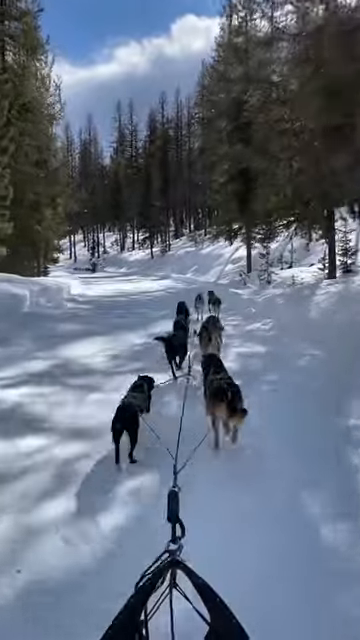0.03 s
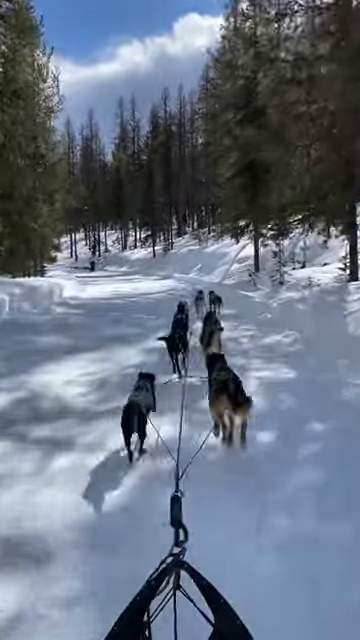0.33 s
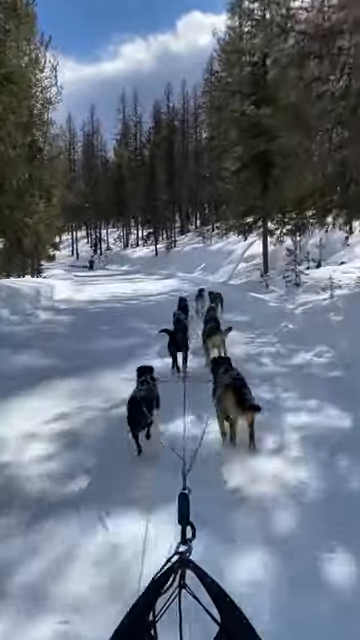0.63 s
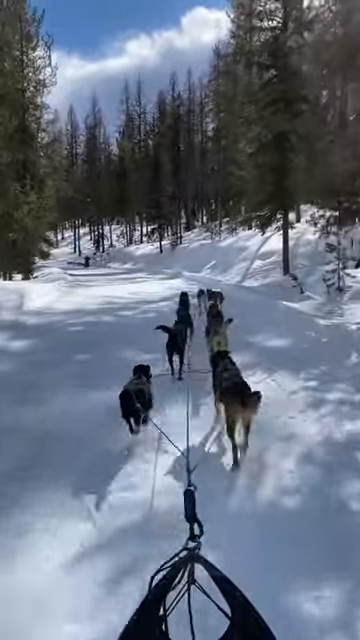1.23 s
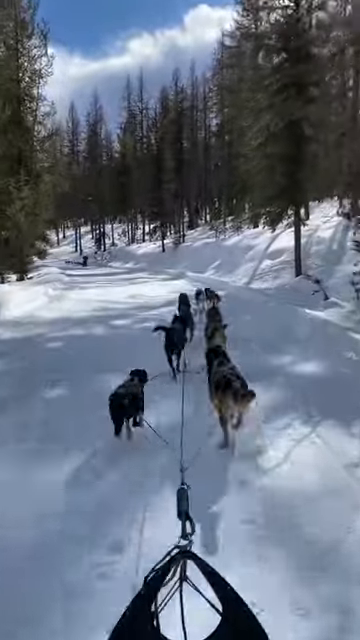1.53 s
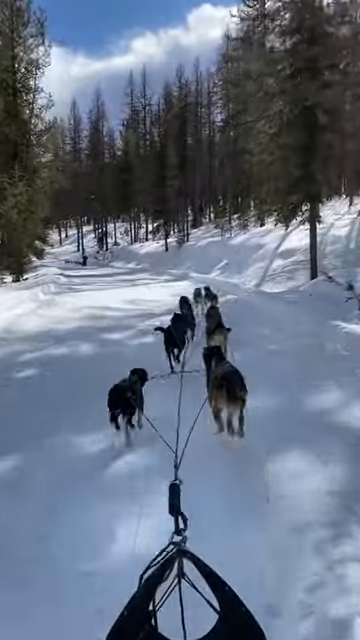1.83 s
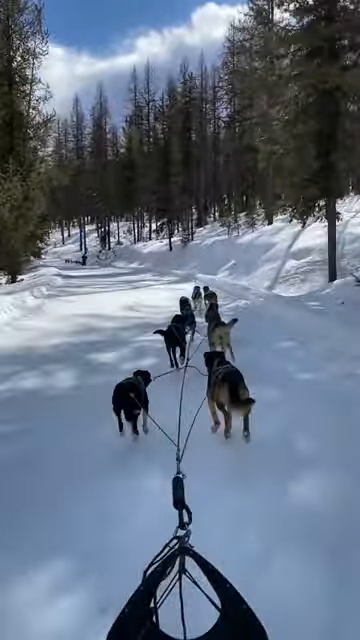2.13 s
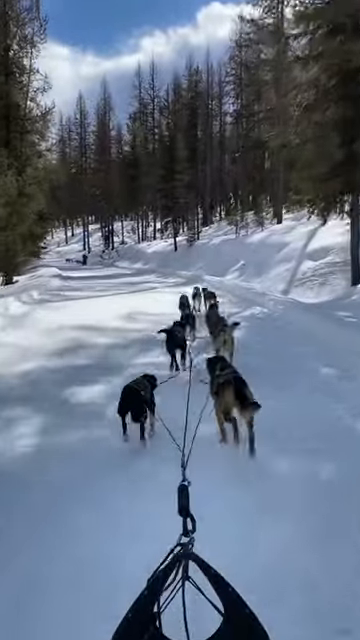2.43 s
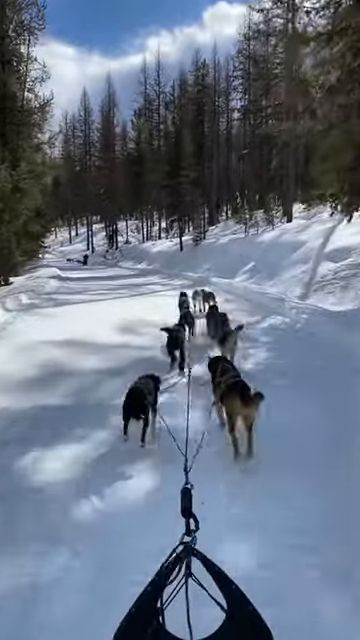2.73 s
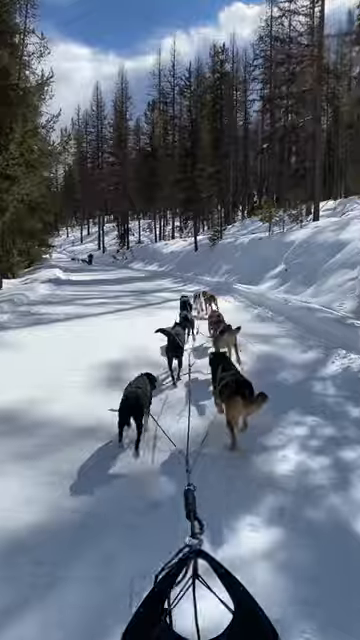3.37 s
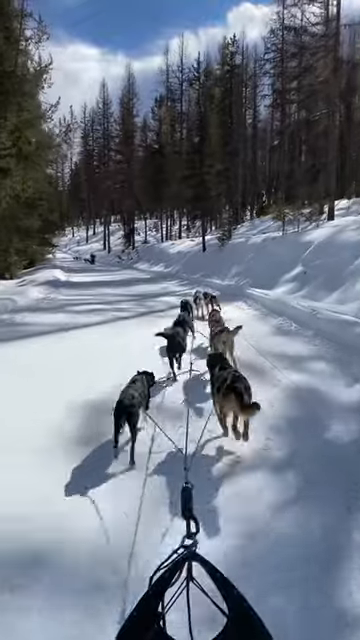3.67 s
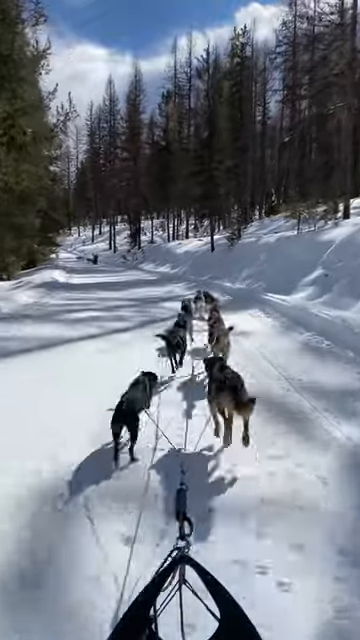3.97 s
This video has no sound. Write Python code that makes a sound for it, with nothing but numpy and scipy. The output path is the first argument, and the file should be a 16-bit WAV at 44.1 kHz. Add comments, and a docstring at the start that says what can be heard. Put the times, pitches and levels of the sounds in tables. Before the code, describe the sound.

A dog sled rattles and hisses over packed snow, paws pattering ahead.

```python
"""A low rattle and rumble over hissing snow: a dog sled on a packed forest trail, heard from a phone on it.
Ridges drive the frame's modes, small jolts of the frame rumble low, and snow grains ring the sliding runners.
Harder bumps thud through the sled, and loaded runners groan as they judder against the snow. Paws patter ahead
in the crust, wider and clearer in the second half. Nearly every sound is a train of random impulses (the
source) shaped by resonances or a spectrum (the filter)."""
import sys
import numpy as np
from scipy import signal
from scipy.fft import rfft, irfft
from scipy.io import wavfile
from scipy.ndimage import uniform_filter1d, map_coordinates

SR = 44100
rng = np.random.default_rng(int(sys.argv[2]) if len(sys.argv) > 2 else 0)


def inscribe(sig):
    """Save sig as 16-bit PCM at rate SR to the path in sys.argv[1].

    A 1-D sig is mono; a 2-D sig holds one channel per row.
    Samples are clipped to [-1, 1] before scaling.
    """
    pcm = np.round(np.clip(np.atleast_2d(sig).T, -1, 1) * 32767)
    wavfile.write(sys.argv[1], SR, pcm.astype(np.int16))


N = 176400

# shaking of the frame: t/s, level/dB
SHAKE_LEVEL = [(0, -33), (.12, -36), (.2, -31), (.55, -29), (.76, -33.5), (.84, -35), (.92, -28),
               (.98, -36), (1.03, -31), (1.2, -28.5), (1.45, -31), (1.6, -33.5), (1.73, -33.5),
               (1.8, -36.5), (1.87, -35), (2.12, -30), (2.27, -36.5), (2.4, -30), (2.6, -30.5),
               (2.68, -32.5), (2.88, -29), (3.1, -34), (3.4, -32), (3.46, -35.5), (3.66, -29.5),
               (3.76, -38), (3.83, -32), (4, -30.5)]
# modes of the frame: f/Hz, bandwidth/Hz, level/dB
FRAME_MODES = [(184.3, 31, -2.5), (269, 36, 0), (353.3, 42, 2), (459.5, 38.4, -5.5), (567, 56, -10.5),
               (678, 79, -9.5), (801, 61, -9)]
# rumble of the jolting frame: t/s, level/dB
RUMBLE_LEVEL = [(0, -31.5), (.06, -43), (.2, -29), (.6, -32), (1.0, -34.5), (2.15, -37), (2.6, -34.5),
                (2.8, -38), (3.15, -33.5), (3.65, -30.5), (3.76, -35), (3.82, -27), (4, -36)]
# spectrum of the rumble: f/Hz, level/dB
RUMBLE_SPECTRUM = [(18, -36), (32, -19), (48, -5), (68, 3), (85, -2.5), (105, 2), (140, 2.5), (200, -11.5),
                   (300, -18.5), (700, -50), (3000, -105)]
# sliding hiss: t/s, level/dB
GLIDE_LEVEL = [(0, -41.5), (.04, -41.5), (.15, -37), (.92, -38), (.98, -38.5), (1.03, -37.5), (1.4, -38),
               (1.48, -40), (1.57, -37), (1.78, -40.5), (3, -38.5), (3.3, -40.5), (3.66, -40.5),
               (3.72, -42.5), (3.8, -41), (4, -39)]
# scraping snow grains: f/Hz, level/dB
SCRAPE_SPECTRUM = [(250, -38.5), (600, -15), (850, 2.5), (1130, -22.5), (1400, -6), (1800, 2.5), (2600, 4),
                   (2880, -3), (3400, -0.5), (5000, -3), (6500, -1.5), (10000, -35.5)]
# modes of the runners: f/Hz, bandwidth/Hz, level/dB
RUNNER_MODES = [(1380, 93, 9.5), (1546, 61, 5.5), (2130, 390, 0.5), (2410, 79, 2), (2676, 62, 6.5),
                (3086, 25, 8), (4060, 290, -7.5)]
# loose spray: f/Hz, level/dB
SPRAY_SPECTRUM = [(300, -55), (700, -18), (1100, -13), (1350, 2), (1900, -4), (2600, 0), (3300, -.5),
                  (4200, 0), (5500, -3.5), (7300, -12), (9500, -45)]
# snow noise, left minus right: f/Hz, level/dB
SNOW_LEFT_BIAS = [(700, 0), (1550, 2.3), (2050, .3), (2400, 2.8), (2700, .6), (3500, .7), (4000, -4.5),
                  (4450, -4.3), (5000, 0), (9000, 0)]
# coarse crust under the runners: t/s, level/dB
RASP_LEVEL = [(0, -50.5), (.3, -44.5), (1.2, -42.5), (1.58, -40.5), (1.8, -48), (2.4, -45), (2.95, -43),
              (3.4, -57), (4, -54)]
# resonances of the rasp: f/Hz, bandwidth/Hz, level/dB
RASP_MODES = [(2427, 220, 4), (2690, 170, 1), (3040, 110, -4), (3340, 260, 1.5), (3900, 220, 1.5),
              (4200, 260, 1)]
# faint, very high hiss: f/Hz, level/dB
HIGH_HISS_SPECTRUM = [(10500, -45), (11700, -22), (12600, 0), (15500, -2)]
# patter of the team: t/s, level/dB, stereo width (0-1)
PATTER_COURSE = [(0, -41, 0.28), (1.4, -39, 0.35), (2.1, -41, 0.55), (2.499, -40, 0.68), (3.2, -38.5, 0.84),
                 (4, -39, 0.84)]
# crunch of a paw: f/Hz, level/dB
PAW_SPECTRUM = [(150, -83.5), (500, -59), (650, -13.5), (780, -3.5), (880, 4), (1000, 5.5), (1180, -2.5),
                (1350, -2), (1700, -8), (2600, -15.5), (9000, -86)]
# bumps in the trail: t/s, thud level/dB, boom level/dB, knock level/dB
TRAIL_BUMPS = [(.104, -24.5, -29, -44), (0.159, -21.5, -25.5, -42), (.217, -24.5, -27, -27.5),
               (.368, -25, -42, -40), (.417, -22.5, -27, -31.5), (0.446, -27.5, -26, -45),
               (0.522, -28.5, -28.5, -32), (0.782, -34, -45.5, -24), (0.852, -21.5, -34, -31),
               (1.052, -24, -33, -49), (1.117, -28, -34, -21.5), (1.132, -26, -36, -38),
               (1.261, -35, -41, -30), (1.436, -36, -39, -23), (1.567, -31, -26, -31),
               (1.701, -25.5, -22, -28), (1.741, -23.5, -27, -28), (1.863, -23, -32, -33),
               (1.973, -40, -26, -26), (2.029, -40, -30, -30.5), (2.125, -28.5, -31, -27.5),
               (2.162, -24, -25.5, -28), (2.195, -27, -33.5, -40), (2.225, -24, -29, -38),
               (2.385, -31, -26, -34.5), (2.892, -56, -30, -33), (2.97, -21.5, -29, -45),
               (3.14, -24, -44, -56), (3.22, -42, -30, -29.5), (3.29, -23, -27, -28),
               (3.325, -31, -38, -50), (3.544, -20, -25, -24), (3.608, -24, -26, -29),
               (3.682, -17.5, -30.5, -22), (3.718, -28, -29, -46)]
# low thud of a bump: f/Hz, level/dB
THUD_SPECTRUM = [(20, -24), (35, -19), (50, -3), (70, -1), (105, -5), (135, -6.5), (200, -28), (700, -68),
                 (3000, -110)]
# hollow modes of the sled's bed: f/Hz, bandwidth/Hz, level/dB
BED_MODES = [(156, 88, 0), (227, 77, -1.5)]
# dull body of a knock: f/Hz, level/dB
KNOCK_SPECTRUM = [(60, -22), (170, -4), (290, 0), (520, -3), (700, -27), (1100, -42), (4000, -80)]
# runners biting into packed snow: start t/s, duration/s, level/dB
GROAN_EVENTS = [(0.176, 0.058, -31), (0.488, 0.15, -33), (0.675, 0.1, -33), (1, .09, -28),
                (1.358, 0.084, -36)]


def undb(db):
    """Amplitude ratio: tenfold for every 20 dB."""
    return 10 ** (np.asarray(db) / 20)


def unit(x):
    """Normalisation to rms 1."""
    return x / np.sqrt(np.mean(x ** 2))


def follow(curve):
    """Amplitude envelope through (t/s, level/dB) points."""
    return undb(np.interp(np.arange(N) / SR, *np.array(curve).T))


def colour(x, points, share=1):
    """Spectral shaping through (f/Hz, level/dB) points; share scales the decibels."""
    hz, db = np.array(points).T
    f = np.maximum(np.fft.rfftfreq(N, 1 / SR), 1)
    return irfft(rfft(x) * undb(share * np.interp(np.log(f), np.log(hz), db)), N)


def ring(x, modes):
    """Modal superposition: damped resonances of alternating sign, each squared for steeper skirts."""
    f = np.maximum(np.fft.rfftfreq(N, 1 / SR), 1)
    response = sum(undb(db) / (1 + .5j * (f * f - hz * hz) / (f * width)) ** 2 * (-1) ** k
                   for k, (hz, width, db) in enumerate(modes))
    return unit(irfft(rfft(x) * response, N))


def wander(rate):
    """Random modulation of rms 1: smoothed steps, rate per second."""
    hold = max(int(SR / rate), 2)
    steps = rng.standard_normal(N)[np.arange(N) // hold]
    return unit(uniform_filter1d(uniform_filter1d(steps, hold), hold))


def grains(rate, spread_db):
    """Shot noise: random impulses, on average rate per second, of log-normal size."""
    impulses = (rng.random(N) < rate / SR) * rng.choice([-1, 1], N)
    return unit(impulses * undb(spread_db * rng.standard_normal(N)))


def swell(at, rise_s, fall_s):
    t = np.arange(N) / SR - at
    return np.exp(-np.where(t < 0, (t / rise_s) ** 2 / 2, (t / fall_s) ** 2 / 2))


def steady(x, seconds):
    """Division by the running rms evens out a vibration's slow swings."""
    return x / np.sqrt(uniform_filter1d(x ** 2, max(int(seconds * SR), 2)) + 1e-6)


def flex(x, share, rate):
    """Frequency modulation: changing load bends the resonances by a small share."""
    drift = share * wander(rate)
    return map_coordinates(x, [np.arange(N) + np.cumsum(drift - drift.mean())], mode="mirror")


def flicker(x, depth_db=3.6):
    """Random amplitude modulation of narrow bands makes a hiss flicker."""
    bands = signal.stft(x, nperseg=1024)[2]
    ripple = uniform_filter1d(rng.standard_normal(bands.shape), size=3, axis=0)
    ripple = unit(uniform_filter1d(ripple, size=3, axis=1))
    return unit(signal.istft(bands * undb(depth_db * ripple), nperseg=1024)[1][:N])


def frame():
    """Forced vibration: ridges of packed snow drive the frame's modes, which shift as it flexes."""
    ridges = grains(990, spread_db=0)
    shake = steady(flex(ring(ridges, FRAME_MODES), share=.025, rate=6), seconds=.05)
    return shake * follow(SHAKE_LEVEL) * undb(.5 + 1.75 * wander(27.6))


def rumble():
    """Low-frequency rumble: small bumps in the trail jolt the sled frame."""
    pressure = steady(colour(grains(500, spread_db=3), RUMBLE_SPECTRUM), seconds=.05)
    return pressure * follow(RUMBLE_LEVEL) * undb(1.5 * wander(23.5))


def runners(right_lag_s=5.15e-5):
    """Friction noise: snow grains scrape and ring the runners; loose spray hisses all round."""
    scrape = undb(-2 + .17 * wander(28)) * flicker(colour(grains(9000, spread_db=4), SCRAPE_SPECTRUM))
    ring_gain = undb(-4.5 + wander(21.4))
    ringing = flex(ring(grains(5000, spread_db=0), RUNNER_MODES), share=.012, rate=8)
    left = scrape + ring_gain * ringing
    right = irfft(rfft(left) * np.exp(-2j * np.pi * np.fft.rfftfreq(N, 1 / SR) * right_lag_s), N)
    spray = np.array([flicker(colour(grains(9000, spread_db=4), SPRAY_SPECTRUM)) for _ in range(2)])
    spray *= undb(-8 + 1.7 * wander(30.27))
    return (np.array([left, right]) + spray) * follow(GLIDE_LEVEL) * undb(.34 * wander(12))


def rasp():
    """Impact excitation: coarse grains of crust drive narrow resonances, each independently."""
    sides = np.zeros((2, N))
    for side in sides:
        for hz, width, db in RASP_MODES:
            gain = undb(db + .6 * wander(13)) * np.sqrt(width)  # power grows with bandwidth
            side += gain * ring(grains(5000, spread_db=7.5), [(hz, width, 0)])
    return unit(sides) * follow(RASP_LEVEL) * undb(-5.5)


def high_hiss():
    """Filtered shot noise, independent on each side, gives a faint, very high hiss that flickers."""
    hiss = np.array([unit(colour(grains(9000, spread_db=4), HIGH_HISS_SPECTRUM)) for _ in range(2)])
    return hiss * undb(-57 + 1.8 * wander(16))


def paws(steps_per_s=13):
    """Overlapping footfalls modulate the crust's crunch; a growing side signal widens the patter."""
    steps = sum(swell((k + .2 * jitter) / steps_per_s, rise_s=.011, fall_s=.026) * undb(size_db)
                for k, (jitter, size_db) in enumerate(rng.standard_normal((70, 2))))
    mid, side = (unit(colour(grains(6000, spread_db=2), PAW_SPECTRUM)) for _ in range(2))
    at, db, width = np.array(PATTER_COURSE).T
    t = np.arange(N) / SR
    angle = np.pi / 2 * np.interp(t, at, width)
    crunch = mid * np.cos(angle) + side * np.sin(angle) * np.array([[1], [-1]])
    return crunch * unit(steps + 1) * undb(np.interp(t, at, db))


def bumps():
    """Transient excitation: each burst of blows gives a thud, a boom of the bed and a frame knock."""
    thud = steady(colour(grains(700, spread_db=-.5), THUD_SPECTRUM), seconds=.0175)
    boom = steady(ring(grains(700, spread_db=1), BED_MODES), seconds=.027)
    ringing = ring(grains(700, spread_db=5.5), FRAME_MODES)
    dull = undb(-1) * unit(colour(grains(700, spread_db=-1.5), KNOCK_SPECTRUM))
    knock = steady(ringing + dull, seconds=.02)
    out = np.zeros(N)
    for at, thud_db, boom_db, knock_db in TRAIL_BUMPS:
        blow = thud * undb(thud_db - 2) + boom * undb(boom_db - 2.5) + knock * undb(knock_db - 2)
        out += swell(at, rise_s=.013, fall_s=.011) * blow
    return out


def groans(hz=340, width_hz=73, pitch_rise=.077, edge_s=.0064):
    """Friction drives one resonance of a juddering runner; its pitch climbs as the load builds."""
    t, out = np.arange(N) / SR, np.zeros(N)
    for at, length, db in GROAN_EVENTS:
        judder = ring(grains(990, spread_db=-.5), [(hz, width_hz, 0)])
        load = np.clip((t - at) / length, 0, 1)
        rising = map_coordinates(judder, [np.cumsum(1 + pitch_rise * load)], order=1, mode="mirror")
        gate = np.clip(np.minimum(t - at, at + length - t) / edge_s + .5, 0, 1)
        out += steady(rising, seconds=.025) * gate * undb(db)
    return out


def scene():
    """Superposition: the sled's body in the middle, snow and paws around it."""
    left, right = runners() + rasp()
    snow = np.array([colour(left, SNOW_LEFT_BIAS, share=.5), colour(right, SNOW_LEFT_BIAS, share=-.5)])
    return frame() + groans() + rumble() + bumps() + snow + high_hiss() + paws()


def record(dry, low_cut_hz=29, top_hz=15600):
    """Band limiting and soft saturation: the phone cuts both extremes and rounds the loudest peaks."""
    x = signal.sosfilt(signal.butter(4, low_cut_hz, "highpass", fs=SR, output="sos"), dry)
    return signal.sosfilt(signal.ellip(8, .2, 70, top_hz, fs=SR, output="sos"), np.tanh(x))


dry = scene()
out = record(dry)
inscribe(out)
```